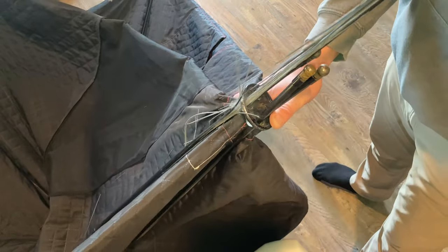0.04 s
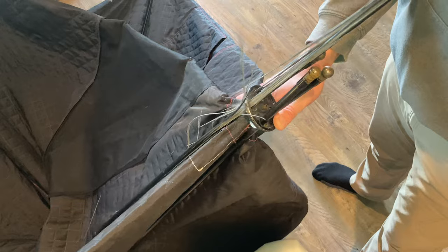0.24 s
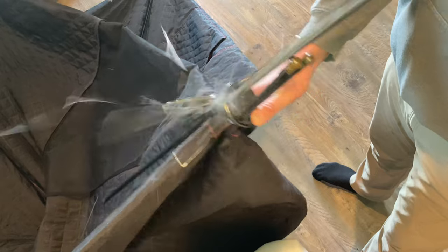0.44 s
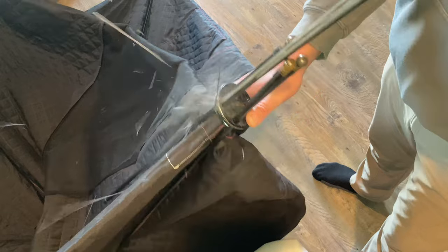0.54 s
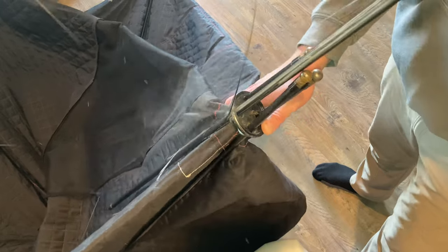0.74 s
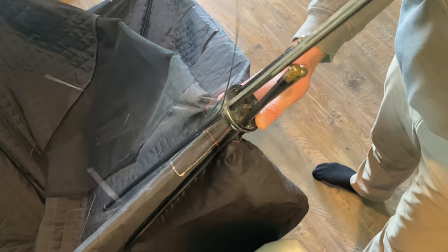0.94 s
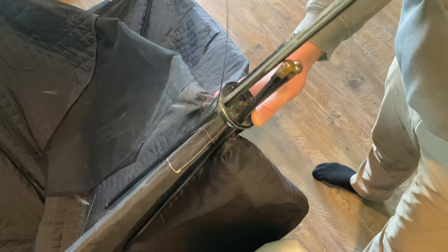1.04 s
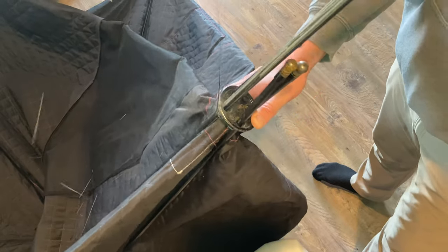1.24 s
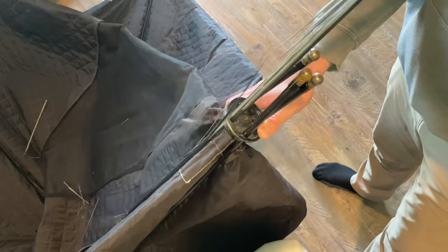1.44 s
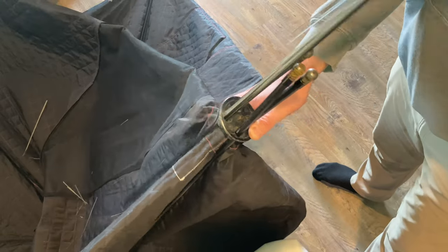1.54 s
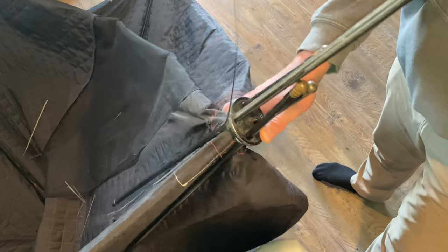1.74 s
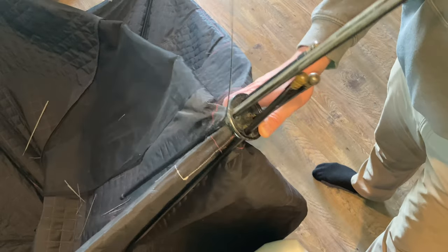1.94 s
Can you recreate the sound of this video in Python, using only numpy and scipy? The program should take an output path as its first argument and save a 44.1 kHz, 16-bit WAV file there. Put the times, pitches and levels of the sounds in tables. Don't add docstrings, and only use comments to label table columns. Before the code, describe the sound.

A splintered rod is forced through a metal hub, close in a quiet room. After near silence, gritty scrapes and bright ticks start at 0.2 s and build to a loud, sharp crack with a hard knock at 0.39 s. A weaker slip and dull knocks come around 0.6 s, then faint cloth crackle and airy brushing. A second crisp snap lands at 1.48 s, small taps near 1.56 s, then soft rustling.

```python
import sys
import numpy as np
from scipy import signal
from scipy.fft import rfft, irfft
from scipy.io import wavfile
from scipy.ndimage import uniform_filter1d

SR = 44100
rng = np.random.default_rng(int(sys.argv[2]) if len(sys.argv) > 2 else 0)


def transcribe(signal):
    frames = np.atleast_2d(signal).T
    limited = np.clip(frames, -1, 1)
    pcm = np.round(limited * 32767).astype(np.int16)
    wavfile.write(sys.argv[1], SR, pcm)


def rack_gain(trim_db):
    fader = np.asarray(trim_db, float)
    return 10 ** (fader / 20)


N = 88200

# (frequency [Hz], level [dB])
AIR_SPECTRUM = [(20, 0), (60, 2.5), (150, 0), (400, -10.5), (1600, -12), (2200, -17), (8000, -25.5),
                (12000, -30), (16000, -31)]
# (peak time [s], peak level [dB], centre [Hz], fizz t60 [s])
FIBRE_SNAPS = [(.0055, -42.5, 9000, 0.0081), (.0623, -53, 8200, .015), (0.079, -52, 8100, 0.017),
               (.121, -49.5, 8500, 0.012), (.168, -59.5, 7100, 0.01), (0.2153, -43, 10900, .01),
               (.218, -37.5, 9700, 0.017), (.2353, -23.5, 9240, 0.011), (.2362, -25.5, 11600, 0.014),
               (0.273, -29, 8300, 0.017), (0.288, -27, 8500, .015), (0.3076, -25.5, 8200, .025),
               (.3737, -28, 10200, 0.021), (0.3833, -21.5, 10400, 0.014), (.39, -21.5, 8250, 0.013),
               (0.3923, -28, 7600, 0.011), (0.4105, -30.5, 5170, 0.016), (0.409, -41, 10500, 0.013),
               (0.4155, -37, 6950, 0.018), (0.5906, -36.5, 6200, 0.016), (.599, -34, 3660, 0.016),
               (0.6115, -30, 5750, 0.016), (0.6167, -28, 7750, 0.012), (0.6526, -35.5, 9500, 0.011),
               (.6877, -50.5, 10900, 0.01), (0.773, -55, 8000, 0.0085), (.853, -57, 5000, 0.0073),
               (1.037, -57.5, 7500, .015), (1.091, -55, 5000, 0.0072), (1.098, -51, 2980, .012),
               (1.177, -52, 10500, .012), (1.2065, -49, 7400, 0.0092), (1.2435, -57, 9000, .014),
               (1.2457, -45, 3360, .016), (1.364, -49, 8500, .015), (1.4129, -46, 8800, 0.0088),
               (1.441, -46, 8500, 0.017), (1.4707, -36, 8000, 0.01), (1.477, -21, 7800, 0.0089),
               (1.4957, -30, 3020, 0.0057), (1.51, -36, 9500, .014), (1.5155, -33, 8800, .015),
               (1.519, -44, 9000, 0.0089), (1.6637, -41, 9900, 0.01), (1.7528, -49.5, 7500, 0.011),
               (1.7933, -56, 8660, 0.01), (1.865, -45.5, 9900, 0.0082), (1.9552, -54, 6040, .012),
               (1.9817, -52, 11400, .012)]
# (time [s], peak level [dB], centre [Hz])
STRAND_CRACKS = [
    (.3829, -11.5, 8000),
    (.3892, -16, 3500),
    (.3896, -8.5, 5500),
    (.3906, -18, 3200),
    (.6306, -36, 1500),
    (1.4779, -20, 8000),
    (1.5612, -34, 3500),
]
# (start [s], rise [s], hold [s], level [dB])
CREASE_MOVES = [(.13, 0.018, 0.012, -70), (.4, .02, 0.019, -54.5), (.56, 0.059, 0.023, -50.5),
                (.72, 0.035, 0.024, -61), (.83, 0.021, 0.016, -59), (1.02, 0.04, 0.22, -62),
                (1.233, 0.0075, 0.082, -59), (1.34, 0.021, 0.16, -63.5), (1.52, 0.0074, 0.04, -51.5),
                (1.72, 0.017, 0.05, -66.5), (1.8, 0.037, 0.073, -62), (1.88, 0.013, 0.068, -61.5)]
# (frequency [Hz], level [dB])
CREASE_SPECTRUM = [(150, -30), (250, -4.5), (800, -0.5), (1750, -6), (2150, -14), (3400, -10),
                   (4800, -19.5), (10000, -26)]
# (start [s], rise [s], hold [s], level [dB])
BRUSH_MOVES = [
    (.13, 0.021, 0.095, -76.5),
    (.72, 0.062, 0.043, -76),
    (1.06, 0.06, 0.11, -78),
    (1.238, 0.009, 0.044, -67),
    (1.27, 0.03, 0.047, -61),
    (1.39, 0.04, 0.022, -67),
    (1.83, 0.066, 0.084, -73),
]
# (frequency [Hz], level [dB])
BRUSH_SPECTRUM = [(2400, -38), (4000, -17), (7800, 0.5), (11000, -1), (13000, -7.5), (15500, -14.5)]
# (start [s], rise [s], hold [s], level [dB])
SHEET_HEAVES = [(.2, 0.046, 0.027, -78), (.26, 0.035, 0.03, -47.5), (.37, 0.0037, 0.0079, -45),
                (.58, 0.029, 0.038, -55), (.64, 0.0071, 0.012, -45), (.72, 0.031, 0.04, -62),
                (1.04, 0.013, 0.091, -65.5), (1.23, 0.011, 0.052, -58), (1.45, 0.02, 0.046, -51),
                (1.51, 0.013, 0.052, -59.5), (1.6, 0.014, 0.032, -62.5), (1.75, 0.1, 0.095, -67),
                (1.93, 0.089, 0.037, -58.5)]
# (frequency [Hz], level [dB])
SHEET_SPECTRUM = [(18, -12), (40, -4), (75, -10), (130, 0), (230, -2), (400, -11), (600, -40)]
# (time [s], peak level [dB], pitch [Hz], t60 [s])
KNOCKS = [(0.218, -45, 1150, .012), (.236, -40, 2070, .03), (0.264, -42, 2220, 0.021),
          (0.273, -42, 249, .05), (0.293, -41, 142, 0.1), (.312, -43.5, 120, 0.077),
          (.376, -36, 69.6, 0.068), (.381, -42, 246, .04), (0.3822, -25, 2160, 0.015),
          (.3859, -13, 1070, 0.014), (.388, -29, 415, .03), (.3893, -20, 3130, 0.02),
          (0.39, -20, 1530, 0.0083), (0.396, -29.5, 1200, 0.01), (.432, -43, 960, 0.037),
          (.443, -44, 1150, .05), (.598, -40, 1630, .03), (.63, -34.5, 517, 0.041),
          (.645, -37.5, 600, 0.034), (.653, -47, 136, 0.15), (.66, -41, 247, 0.11),
          (.672, -44, 188, .05), (0.681, -50, 260, 0.041), (.697, -48, 267, 0.062),
          (0.725, -53.5, 1740, 0.062), (0.73, -47, 172, 0.06), (.731, -52, 750, 0.049),
          (.765, -49, 450, 0.06), (.772, -55.5, 4040, 0.018), (0.786, -51.5, 383, 0.048),
          (.843, -41, 460, 0.037), (.855, -55, 3410, 0.049), (.887, -49, 420, 0.046),
          (.888, -61.5, 1960, 0.027), (1.09, -51.5, 3460, 0.013), (1.099, -51, 2890, 0.033),
          (1.106, -55, 3630, 0.017), (1.234, -50.5, 45, 0.059), (1.2437, -51, 794, 0.071),
          (1.2455, -54.5, 3560, .03), (1.267, -49, 242, 0.081), (1.441, -46.5, 2460, .03),
          (1.478, -33, 3400, 0.0099), (1.484, -32, 985, 0.013), (1.488, -42.5, 318, 0.057),
          (1.547, -36, 2970, 0.0091), (1.561, -32.5, 3140, 0.028), (1.568, -32.5, 1000, 0.013),
          (1.738, -50.5, 497, 0.015), (1.828, -56, 3240, 0.032)]
# (start [s], rise [s], hold [s], level [dB])
ROD_SLIPS = [(.225, 0.0024, .004, -53), (.232, 0.0024, 0.065, -44), (.262, 0.0027, 0.055, -43),
             (.305, 0.0042, 0.024, -37.5), (.33, 0.0042, 0.035, -43.5), (.37, 0.0066, 0.0066, -35),
             (.381, 0.0012, 0.0043, -35), (.584, 0.0097, 0.03, -50), (.6, 0.0035, 0.019, -45.5),
             (1.385, 0.063, 0.03, -51.5), (1.469, 0.0033, 0.0018, -45), (1.474, 0.0024, 0.035, -41)]
# (frequency [Hz], level [dB])
ROD_SPECTRUM = [(240, -29.5), (400, 1.5), (1300, 1.5), (4030, -1), (4700, -4.5), (8280, -0.5), (11500, -2),
                (15500, -8)]
# (start [s], rise [s], hold [s], level [dB])
FRAME_SHUDDERS = [
    (.238, 0.006, 0.039, -49),
    (.393, 0.0022, 0.0084, -41),
    (.408, 0.0033, 0.042, -45),
    (.465, 0.0057, 0.021, -55),
    (.583, 0.0082, 0.047, -57),
    (1.243, .004, 0.038, -67.5),
]
# (frequency [Hz], level [dB])
FRAME_SPECTRUM = [(300, -33.5), (650, -5), (800, 2), (1100, 1.5), (1450, -2.5), (1800, -7), (3000, -30)]
# (frequency [Hz], t60 [s])
ROOM_T60 = [(250, 0.48), (1000, 0.27), (4000, 0.4), (8000, 0.32), (14000, 0.24)]


def unit(x):
    return x / np.sqrt(np.mean(x ** 2))


def colour(x, points):
    hz, db = np.array(points).T
    bins = np.maximum(np.arange(2049) * SR / 4096, 1)
    log_gain = np.interp(np.log(bins), np.log(hz), db) * np.log(10) / 20
    cepstrum = irfft(log_gain)
    cepstrum[1:2048] *= 2
    cepstrum[2049:] = 0
    impulse = irfft(np.exp(rfft(cepstrum)))
    return unit(signal.fftconvolve(x, impulse)[:N])


def walk(rate_hz):
    k = int(SR / rate_hz)
    held = np.repeat(rng.standard_normal(N), k)[:N]
    return unit(uniform_filter1d(held, k))


def clicks(per_s, scatter_db):
    chance, side, size = rng.random((3, N))
    level_db = np.minimum(-scatter_db * np.log(size + 1e-9), 13)
    return (chance < per_s / SR) * np.sign(side - .5) * rack_gain(level_db)


def patchy(per_s, scatter_db, rate_hz):
    edges_hz = (20, 1800, 3500, 6500, 10000, 18000)
    out = np.zeros(N)
    for band in zip(edges_hz, edges_hz[1:]):
        sos = signal.butter(2, band, "band", fs=SR, output="sos")
        register = signal.sosfilt(sos, clicks(per_s, scatter_db))
        out += register * rack_gain(1.9 * walk(rate_hz))
    return out


def strokes(table, t60, rise_db):
    t = np.arange(N) / SR
    power = 0
    for start, rise, hold, db in table:
        up_db = rise_db * np.minimum((t - start) / max(rise, .001) - 1, 0)
        down_db = 60 * np.maximum(t - start - rise - hold, 0) / t60
        power = power + rack_gain(db + up_db - down_db) ** 2
    return np.sqrt(power)


def add(out, start, sound, db):
    i = int(start * SR)
    out[i:i + len(sound)] += (sound * rack_gain(db) / np.abs(sound).max())[:N - i]


def still_air():
    return colour(rng.standard_normal(N), AIR_SPECTRUM) * rack_gain(-64.5)


def snaps():
    rise_s, fizz_oct, spike_oct, crack_oct, spike_db = .0004, .45, .6, 1.1, -7
    out = np.zeros(N)
    t = (np.arange(1024) - 88) / SR
    hz = np.arange(513) * SR / 1024 + 1
    impulse = rfft((t == 0).astype(float))

    def bell(centre, width_oct):
        return np.exp(-.5 * (np.log2(hz / centre) / width_oct) ** 2)

    for s, db, centre, t60 in FIBRE_SNAPS:
        onset = np.exp(np.minimum(t, 0) / rise_s)
        shape = np.where(t < 0, onset, rack_gain(-60 * t / max(t60, .004)))
        fizz = rfft(rng.standard_normal(1024) * shape) * bell(centre, fizz_oct)
        spike = -4 * rack_gain(spike_db) * impulse * bell(centre, spike_oct)
        add(out, s + t[0], irfft(fizz + spike), db)
    for s, db, centre in STRAND_CRACKS:
        add(out, s + t[0], irfft(-impulse * bell(centre, crack_oct)), db)
    return out


def creases():
    crackle = colour(patchy(4000, 2.2, 39.96), CREASE_SPECTRUM) * rack_gain(1.1 * walk(45.5))
    return crackle * strokes(CREASE_MOVES, .41, 10)


def brush():
    hiss = colour(patchy(5000, 2.2, 49.6), BRUSH_SPECTRUM) * rack_gain(0.48 * walk(62.3))
    return hiss * strokes(BRUSH_MOVES, .18, 10)


def heave():
    flap = colour(rng.standard_normal(N), SHEET_SPECTRUM) * rack_gain(1.1 * walk(20.85))
    return flap * strokes(SHEET_HEAVES, .14, 10)


def knocks():
    out, t = np.zeros(N), np.arange(8192) / SR
    for s, db, hz, t60 in KNOCKS:
        overtone = rack_gain(-11) * np.sin(2 * np.pi * 1.37 * hz * t)
        ring = np.sin(2 * np.pi * hz * t) + overtone
        b, a = signal.butter(2, [0.53 * hz, 1.32 * hz], "band", fs=SR)
        puff = unit(signal.lfilter(b, a, rng.standard_normal(8192)))
        puff_db = -18.5 + 5 * np.log2(hz / 300)
        envelope = np.minimum(4 * hz * t, 1) * rack_gain(-60 * t / max(t60, .002))
        add(out, s, (ring + rack_gain(puff_db) * puff) * envelope, db)
    return out


def slip():
    grains = colour(patchy(5000, 3, 110), ROD_SPECTRUM) * rack_gain(1.6 * walk(150))
    return grains * strokes(ROD_SLIPS, .057, 28)


def shudder():
    return colour(clicks(1500, 3), FRAME_SPECTRUM) * strokes(FRAME_SHUDDERS, .12, 28)


def room(x):
    delay_s, level_db = 0.0042, -9
    hz, t, cells = signal.stft(rng.standard_normal(SR // 2), SR, nperseg=128)
    table_hz, table_t60 = np.array(ROOM_T60).T
    t60 = np.interp(np.log(hz + 1), np.log(table_hz), table_t60)
    tail = signal.istft(cells * rack_gain(-60 * t / t60[:, None]), SR)[1]
    tail = tail * (np.arange(len(tail)) > delay_s * SR)
    tail = tail / np.sqrt(np.sum(tail ** 2))
    return signal.fftconvolve(x, tail)[:N] * rack_gain(level_db)


def scene():
    near = snaps() + creases() + brush() + heave() + knocks() + slip() + shudder()
    return (near + room(near) + still_air())[None]


def top_cut(x):
    return signal.sosfilt(signal.butter(12, 16810, fs=SR, output="sos"), x)


def record(dry):
    lowpass = signal.ellip(8, .1, 50, 15800, fs=SR, output="sos")
    low = signal.sosfiltfilt(lowpass, dry)
    mix = low + rack_gain(-33) * (dry - low)
    return top_cut(mix)


dry = scene()
out = record(dry)
transcribe(out)
```